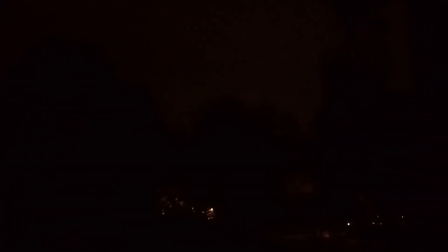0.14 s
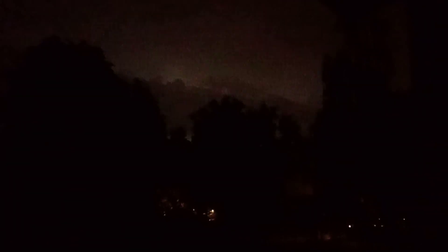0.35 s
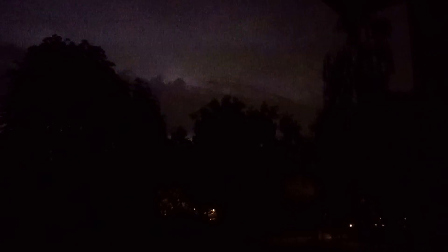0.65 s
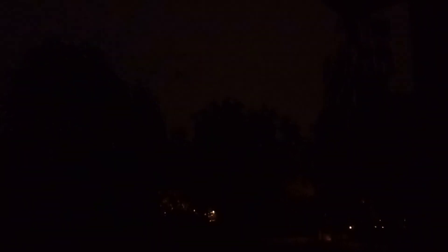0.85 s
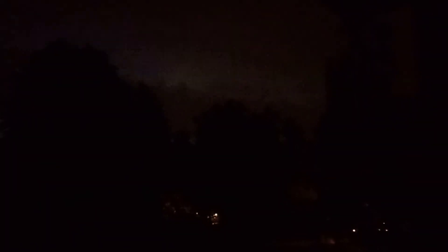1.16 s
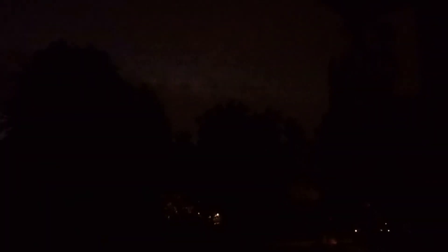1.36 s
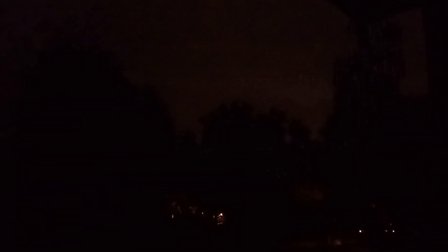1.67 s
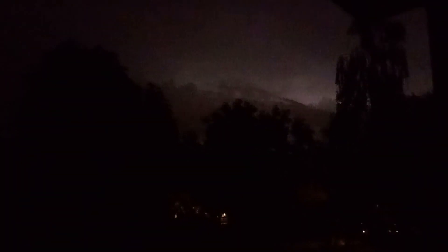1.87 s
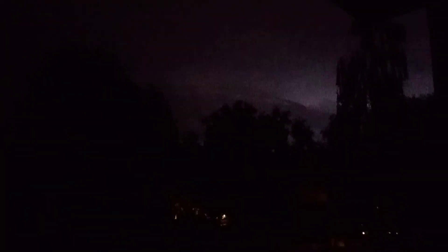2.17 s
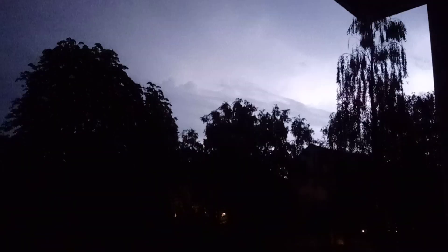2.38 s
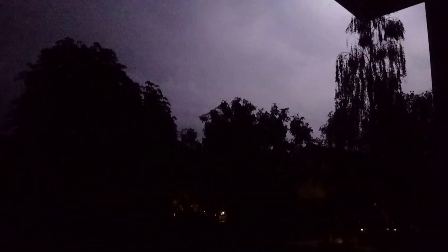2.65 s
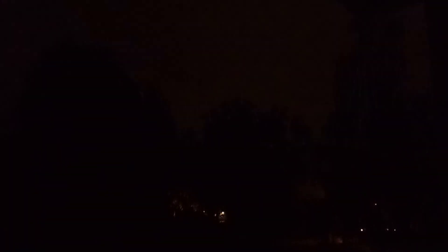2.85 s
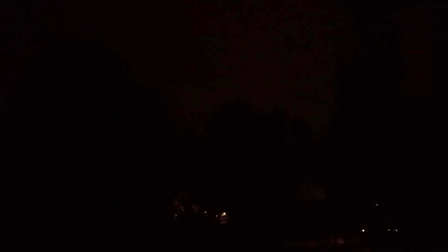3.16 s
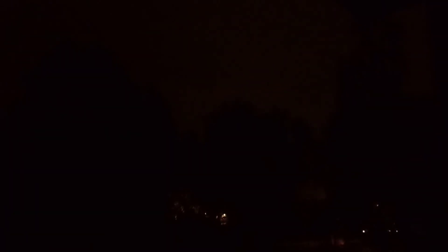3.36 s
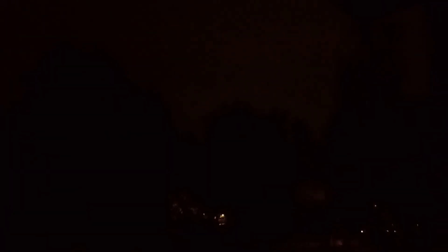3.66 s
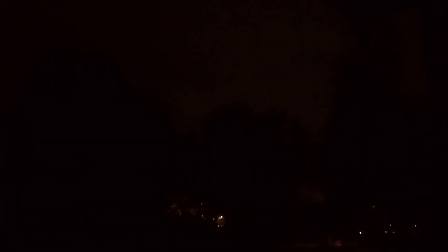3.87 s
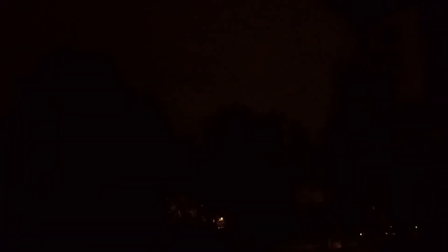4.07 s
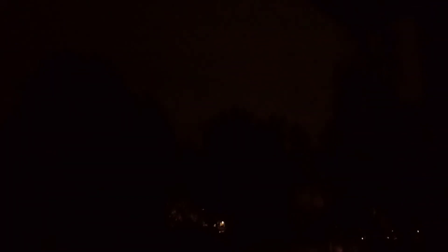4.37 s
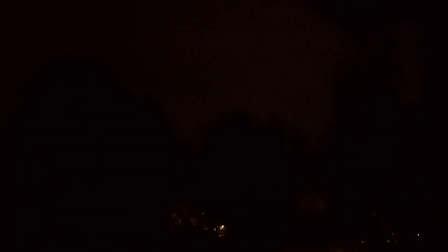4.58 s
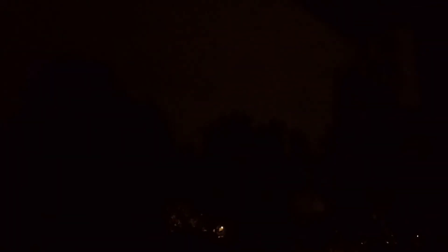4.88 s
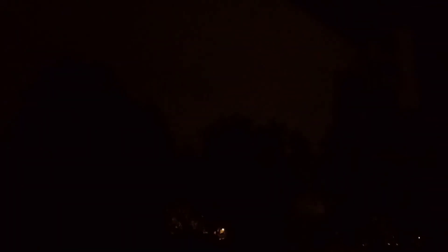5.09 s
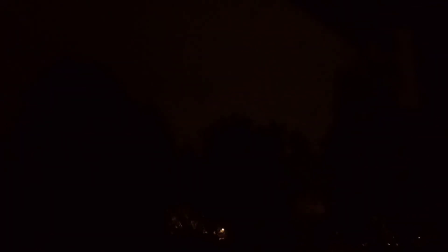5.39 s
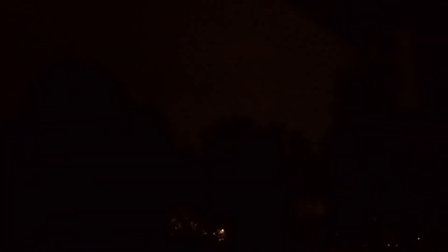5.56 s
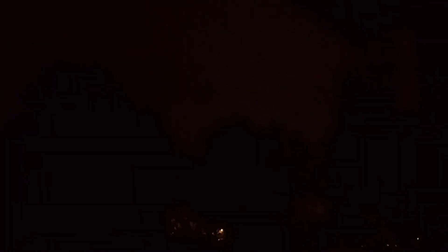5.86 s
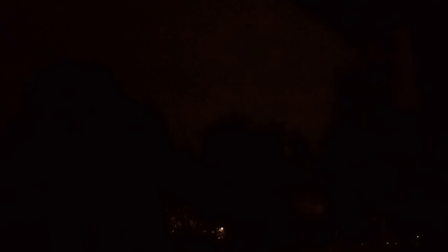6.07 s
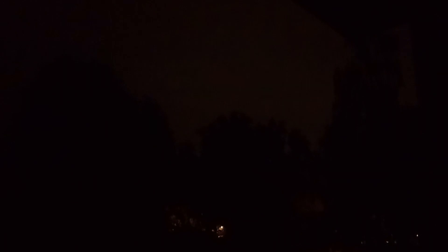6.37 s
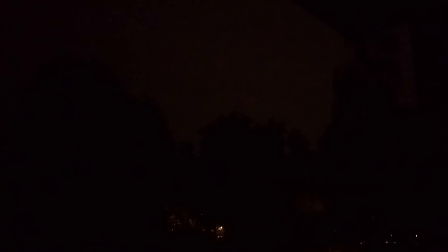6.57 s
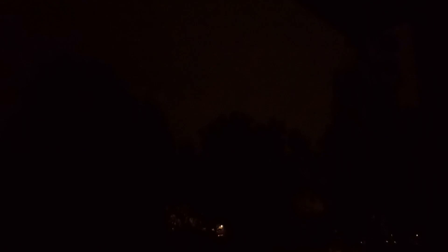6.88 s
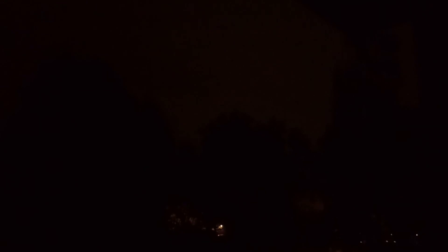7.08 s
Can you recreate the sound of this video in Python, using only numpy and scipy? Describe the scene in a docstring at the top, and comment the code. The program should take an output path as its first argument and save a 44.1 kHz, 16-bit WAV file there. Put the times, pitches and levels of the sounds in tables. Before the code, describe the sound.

An approaching storm heard from a sheltered porch: a long, unbroken low thunder roll with uneven soft booms, never a sharp crack. Thin rain falls around, leaves drip in short irregular flurries, and crisp drops tap close to the microphones. A single hollow, woody-sounding knock with a tiny settling clatter comes before two seconds; then only thunder and rain continue, with a tight cluster of close drops near the end. Right side brighter, slight hiss.

```python
"""Distant thunder rolls without a break, heard from under a porch roof in light rain.
Random shocks, filtered by distance and split into registers, follow level curves with booms and thumps.
Far drops are a noise wash; near ones are noise splashes that patter, drip in flurries or fall singly.
Something hollow knocks once close by and settles: filtered clacks excite ringing modes.
Both channels share the bass of diffuse sound; the left is much duller from 6 to 11 kHz."""
import sys
import numpy as np
from scipy import signal
from scipy.fft import rfft, irfft, next_fast_len
from scipy.io import wavfile
from scipy.ndimage import uniform_filter1d

SR = 44100
rng = np.random.default_rng(int(sys.argv[2]) if len(sys.argv) > 2 else 0)


def generate_wav(sig):
    """Save sig (samples, or channels by samples) to the path in sys.argv[1] as 16-bit PCM at SR."""
    pcm = np.round(np.clip(np.atleast_2d(sig).T, -1, 1) * 32767).astype(np.int16)
    wavfile.write(sys.argv[1], SR, pcm)


N = 318914
TIME = np.arange(N) / SR


def from_db(db):
    """Decibels to amplitude gain."""
    return 10 ** (np.asarray(db) / 20)


def rms_one(x):
    """Scale to an rms of one."""
    return x / np.sqrt(np.mean(x ** 2) + 1e-20)


def in_time(rows):
    """Interpolate each column of a time curve at every sample."""
    s, *columns = np.transpose(rows)
    return [np.interp(TIME, s, column) for column in columns]


def at_hz(points, hz):
    """Read a spectrum on a log-frequency axis."""
    known_hz, values = np.transpose(points)
    return np.interp(np.log(np.maximum(hz, 1)), np.log(known_hz), values)


def colour(x, spectrum, size=8192):
    """Causal minimum-phase filter with the given response, via the folded cepstrum."""
    bins_hz = np.linspace(0, SR / 2, size // 2 + 1)
    cepstrum = irfft(np.log(from_db(at_hz(spectrum, bins_hz))))
    cepstrum[1:size // 2] *= 2
    cepstrum[size // 2 + 1:] = 0
    response = irfft(np.exp(rfft(cepstrum)))
    return signal.fftconvolve(np.atleast_2d(x), response[None], axes=1)[:, :N]


def butter(x, hz, kind, order=2):
    """Causal Butterworth filter."""
    return signal.sosfilt(signal.butter(order, hz, kind, fs=SR, output="sos"), x)


def split(x, hz):
    """Parts below and above a frequency, without phase shift; they sum to the whole."""
    below = signal.sosfiltfilt(signal.butter(6, hz, fs=SR, output="sos"), x)
    return below, x - below


def drift(per_s):
    """Random wandering of rms one, with per_s knots a second."""
    knots = rng.standard_normal(2048)
    return rms_one(np.interp(TIME * per_s, np.arange(len(knots)), knots))


def diffuse(pair):
    """Mix two unrelated signals so that their correlation matches sound from all around."""
    # likeness of diffuse sound at the two microphones: (frequency [Hz], correlation [-1..1])
    likeness = [(60, 1), (150, 0.98), (280, 0.9), (450, 0.72), (700, 0.32), (1000, 0.48), (1300, 0.0097),
                (1700, -0.44), (2250, 0.31), (2700, -0.012)]
    size = next_fast_len(N, True)
    mid, side = rfft(pair, size)
    alike = np.clip(at_hz(likeness, np.linspace(0, SR / 2, len(mid))), -1, 1)
    mid = mid * np.sqrt((1 + alike) / 2)
    side = side * np.sqrt((1 - alike) / 2)
    return irfft(np.array([mid + side, mid - side]), size)[:, :N]


def arrivals(per_s, spread_db):
    """Impulses at random moments, of random size and sign."""
    born = rng.random(N) < per_s / SR
    sizes = from_db(spread_db * np.clip(rng.standard_normal(N), -2, 2))
    return born * sizes * rng.choice([-1, 1], N)


def burst(hit_t60, tail_db, tail_t60, build_s=0.0013):
    """Half-second stereo noise spatter; reflections under the roof build up, then die away (t60 [s])."""
    t = TIME[:SR // 2]
    hit = from_db(-60 * t / hit_t60)
    reflections = from_db(tail_db - 60 * t / tail_t60) * (1 - np.exp(-t / build_s))
    return np.hypot(hit, reflections) * rng.standard_normal((2, len(t)))


def add(out, s, sound):
    """Mix a sound in at its moment."""
    start = max(round(s * SR), 0)
    out[:, start:start + sound.shape[1]] += sound[:, :N - start]


def far_rain(patches_per_s=12, flutter_db=0.75):
    """Countless drops on trees and roofs merge into noise; each surface (band) flutters by itself."""
    # wash spectrum: (frequency [Hz], relative density [dB/Hz])
    wash_spectrum = [(150, -37.5), (450, -2), (800, -3), (1200, -1.5), (1750, 1.5), (3000, -0.6),
                     (6500, -3), (8200, -17), (12000, -14.5), (16000, -26)]
    # wash level: (time [s], level [dB])
    wash_level = [(0, -55), (1.5, -55), (2.2, -55.5), (7.23, -54.5)]
    out, rest = 0, rms_one(diffuse(colour(rng.standard_normal((2, N)), wash_spectrum)))
    for edge_hz in [700, 1100, 1700, 2600, 3800, 5500]:
        surface, rest = split(rest, edge_hz)
        out = out + surface * from_db(flutter_db * drift(patches_per_s))
    return from_db(in_time(wash_level)[0]) * (out + rest)


def splash(pitch_hz, t60, width, broad_db, tail_db):
    """One drop: a noise slap in which the struck leaf or puddle stresses one pitch; peak 1."""
    slap = burst(hit_t60=t60, tail_db=tail_db, tail_t60=.2)[:, :SR // 5]
    pitched = butter(slap, [pitch_hz / width, pitch_hz * width], "band")  # width: frequency ratio
    sound = pitched + from_db(broad_db) * butter(slap, [1500, 7000], "band")
    return sound / np.abs(sound).max()


def patter(drops_per_s, spectrum, count=16):
    """Drops fall at random on spots of different pitch; rms 1."""
    out = 0
    for hz in np.geomspace(1900, 9000, count):
        spot = splash(hz, t60=0.011, width=1.142, broad_db=-11, tail_db=-12)
        hits = arrivals(drops_per_s / count, spread_db=2.5)
        out = out + signal.oaconvolve(hits[None], spot, axes=1)[:, :N]
    return rms_one(diffuse(colour(out, spectrum)))


def flurry_strength(rise_s=0.026, fall_db_per_s=84):
    """Gain of the drip flurries: each rises quickly to its crest, then thins out."""
    # drip flurries from the leaves: (crest time [s], level [dB])
    flurries = [(0.1, -58), (0.25, -51.5), (0.84, -51.5), (0.92, -63), (1.1, -52), (1.26, -57.5),
                (1.72, -54.5), (1.8, -68), (2.02, -58), (2.11, -61), (2.15, -61), (2.33, -52.5),
                (2.72, -54), (2.85, -56), (2.96, -59), (3.18, -56.5), (3.29, -60), (3.485, -64),
                (3.61, -59), (3.73, -59.5), (4.26, -52.5), (4.38, -54), (4.55, -59), (4.665, -60),
                (5.005, -56), (5.18, -53.5), (5.41, -55), (5.5, -58), (5.96, -59), (6.05, -56.5),
                (6.52, -56), (6.61, -55.5), (6.81, -67), (7.08, -56.5)]
    power = 0
    for s, db in flurries:
        rise = np.clip(1 + (TIME - s) / rise_s, 0, 1)
        fall = from_db(db - fall_db_per_s * np.maximum(TIME - s, 0))
        power = power + (rise * fall) ** 2
    return np.sqrt(power)


def near_rain(drops_per_s=230, drips_per_s=400, wander_db=0.9, wanders_per_s=14):
    """A gently wandering patter all around, and brighter flurries of drips from the nearest leaves."""
    # patter between the flurries: (time [s], level [dB])
    patter_level = [(0, -58.5), (0.7, -63), (1.3, -56.5), (1.45, -66), (1.6, -55), (2.6, -58), (3.8, -55.5),
                    (4.0, -60.5), (4.2, -59), (5.6, -56), (6.4, -61), (7.23, -56)]
    # filter on the patter splashes: (frequency [Hz], gain [dB])
    patter_filter = [(300, -47), (900, 7.5), (2000, -3), (4000, -4), (6500, 1.5), (8200, -3), (12000, -12),
                     (16000, -8)]
    # filter on the flurry splashes: (frequency [Hz], gain [dB])
    flurry_filter = [(1200, -21), (2200, -3), (4000, -3), (6500, 0), (8200, 2), (9500, -9), (12000, -12),
                     (16000, -24)]
    steady_gain = from_db(in_time(patter_level)[0] + wander_db * drift(wanders_per_s))
    steady = steady_gain * patter(drops_per_s, patter_filter)
    return steady + flurry_strength() * patter(drips_per_s, flurry_filter)


def close_drops(drop_db=3, tick_db=17, tick_hz=8600, tick_right_db=2):
    """Fat drops from the eaves, nearly dry, and thin high-passed ticks of spray a little to the right."""
    # fat drops: (time [s], peak before drop_db [dB], pitch [Hz], splash t60 [s])
    fat_drops = [(0.2547, -48, 6150, .05), (0.4539, -42, 6100, .012), (0.8307, -48, 3770, .014),
                 (0.831, -48, 2340, .014), (0.8544, -49, 4200, .03), (0.9193, -43, 6270, 0.013),
                 (0.9393, -47, 4420, .014), (1.0874, -55, 4480, .02), (1.2565, -53, 5420, .012),
                 (1.302, -40, 5890, .012), (1.803, -41, 5800, .025), (2.0167, -45, 6300, .025),
                 (2.1046, -50.5, 3380, .014), (2.15, -43.5, 4440, 0.027), (2.743, -48, 4480, .02),
                 (3.1698, -37, 5130, 0.0089), (3.1697, -47, 2340, 0.011), (3.4795, -45, 4570, .014),
                 (3.492, -46, 3950, .014), (3.587, -43, 4470, .012), (3.6114, -43.5, 5140, .018),
                 (3.643, -42.5, 5080, .025), (3.6424, -44.5, 2030, .014), (3.716, -54, 6070, .012),
                 (3.7487, -44, 3630, .014), (4.5356, -49, 6180, .012), (4.5498, -42.5, 3750, .014),
                 (4.654, -43, 6540, 0.012), (4.999, -44, 5600, .02), (5.166, -44, 6400, .014),
                 (5.191, -39, 6760, .012), (5.195, -42, 6000, .016), (5.4066, -48, 2450, .014),
                 (5.453, -40.5, 3600, .016), (5.963, -45, 5570, .014), (6.0711, -46, 4310, .012),
                 (6.2176, -44, 4030, 0.015), (6.581, -38, 5360, 0.024), (6.604, -40.5, 3800, .03),
                 (6.606, -37.5, 5740, 0.045), (6.621, -44, 4600, .03), (6.664, -41.5, 2290, 0.0097),
                 (6.6655, -50, 5130, .014), (6.68, -42.5, 4960, 0.025)]
    # spray ticks: (time [s], peak before tick_db and pan [dB])
    spray_ticks = [(1.666, -53), (2.1065, -60), (5.1897, -51.5), (5.901, -59), (6.2152, -58)]
    out = np.zeros((2, N))
    for s, peak_db, hz, t60 in fat_drops:
        drop = splash(hz, t60, width=1.22, broad_db=-13, tail_db=-15)
        add(out, s, from_db(peak_db + drop_db) * drop)
    pan_db = tick_right_db * np.array([[-1], [1]])
    for s, peak_db in spray_ticks:
        tick = butter(burst(hit_t60=0.013, tail_db=-6.0, tail_t60=0.15), tick_hz, "high", order=10)
        add(out, s, from_db(peak_db + tick_db + pan_db) * tick / np.abs(tick).max())
    return out


def knock(clack_db=5.5, ring_db=-1.5, rise_s=0.0014, spot_width=1.15,
          scatter_max=.65, scatters_per_s=55, scatter_build_s=.1):
    """Contacts clack and feed hollow modes, which start in step at the soft first thump, then scatter."""
    # soft first thump, knock and settling rattle:
    # (time [s], relative level [dB], brightness [Hz], pitch stressed by the touched spot [Hz])
    contacts = [(1.627, -34.5, 410, 455), (1.666, -51.5, 600, 520), (1.7103, -42.5, 3000, 700),
                (1.7148, -38.5, 2400, 750), (1.721, -42, 3500, 2050), (1.735, -45, 2200, 1130),
                (1.76, -53, 1800, 440), (1.775, -58, 2200, 920), (1.795, -55, 3500, 2300),
                (1.812, -56, 1500, 620), (1.872, -58, 1600, 1350), (1.928, -67, 2000, 890)]
    # filter on the contact noise: (frequency [Hz], gain [dB])
    clack_filter = [(120, -12), (330, 1), (560, 9), (720, 6), (1000, -1), (1400, -0.5), (1700, -7),
                    (2150, -2.5), (2900, -3), (6000, -5), (12000, -45)]
    # modes of the hollow thing: (frequency [Hz], relative level [dB], t60 [s], left minus right [dB])
    modes = [(380, -11, 0.33, 7), (463, -5, 0.082, 0), (496, -15.5, 0.92, 0), (578, -17, .2, 0),
             (647, -0.5, 0.12, -5), (697, 1, 0.13, 15), (795, -3.5, 0.11, -10), (867, -21, 0.13, -1),
             (1060, -9, 0.16, -8), (1100, -28, 0.14, 2), (1217, -24, 0.64, -4), (1350, -24, 1, 5),
             (1407, -25, 1, -2), (1540, -25, 0.42, 0), (2030, -9, 0.086, -5), (2320, -16, 0.13, 3)]
    clacks, rings = np.zeros((2, N)), np.zeros((2, N))
    for s, level_db, bright_hz, spot_hz in contacts:
        clack = butter(burst(hit_t60=0.051, tail_db=-10.5, tail_t60=0.91), bright_hz, "low")
        clack = clack + butter(clack, [spot_hz / spot_width, spot_hz * spot_width], "band")
        add(clacks, s, from_db(level_db + clack_db) * clack)
    at, contact_db, bright_hz, _ = np.transpose(contacts)[:, :, None]
    age = TIME[:SR] - (at - at.min())
    main_age = age[np.argmax(contact_db)]  # the first thump has the highest level
    # echoes under the roof make the ringing ragged
    scatter = scatter_max * np.clip(main_age / scatter_build_s, 0, 1)
    for hz, mode_db, t60, pan_db in modes:
        decay = from_db(contact_db - 60 * np.abs(age) / t60)
        feeds = np.clip(age / rise_s, 0, 1) * decay
        feeds = feeds / np.hypot(1, (hz / bright_hz) ** 4)  # dull contacts feed high modes less
        envelope = np.linalg.norm(feeds, axis=0)
        wander = drift(scatters_per_s)[:SR] + 1j * drift(scatters_per_s)[:SR]
        phasor = np.sqrt(1 - scatter ** 2) + scatter * wander / np.sqrt(2)
        mode = envelope * np.imag(phasor * np.exp(2j * np.pi * hz * main_age))
        side_db = np.array([[pan_db], [-pan_db]]) / 2
        add(rings, at.min(), from_db(mode_db + ring_db + side_db) * mode)
    return diffuse(colour(clacks, clack_filter)) + rings


def boom_power(hz, width_octaves=0.42):
    """A boom is a bundle of shocks arriving together: it swells and fades, strongest near its pitch."""
    # booms out of the roll: (crest time [s], length [s], level at own pitch [dB], pitch [Hz])
    booms = [(0.153, 0.043, -43.5, 157), (0.348, 0.061, -37, 87), (0.53, 0.19, -45, 174),
             (0.876, 0.059, -39.5, 171), (1.061, 0.094, -38, 82.5), (1.248, 0.046, -43, 260),
             (1.51, 0.097, -36.5, 91), (1.706, 0.19, -56, 159), (1.748, 0.23, -36, 87),
             (2.034, 0.058, -41, 111), (2.352, 0.17, -38.5, 99), (2.384, 0.071, -43, 213),
             (2.448, 0.053, -33.5, 170), (2.56, 0.1, -36.5, 143), (3.1, 0.04, -41, 130),
             (3.155, 0.035, -45, 213), (3.247, 0.042, -32, 77), (3.393, 0.035, -45, 230),
             (3.395, 0.033, -36, 133), (3.439, 0.176, -39.5, 77), (3.556, 0.073, -39, 155),
             (3.573, 0.066, -47.5, 48), (3.665, 0.049, -43, 185), (3.68, 0.093, -52.5, 342),
             (3.71, 0.092, -42.5, 108), (3.858, 0.095, -47, 151), (4.297, 0.062, -39.0, 73),
             (4.457, 0.029, -40.5, 125), (4.58, 0.048, -37, 113), (4.677, 0.17, -50, 229),
             (4.926, 0.07, -44.5, 157), (5.016, 0.11, -47.0, 139), (5.3, 0.22, -45, 145),
             (5.374, 0.05, -57, 319), (5.68, 0.062, -39, 128), (5.987, 0.052, -45, 155),
             (6.602, 0.057, -37, 163), (6.717, 0.091, -39.5, 182), (6.753, 0.05, -54.5, 420),
             (6.832, 0.047, -40, 210), (6.898, 0.12, -37.5, 159), (7.04, 0.05, -41.0, 111)]
    power = 0
    for s, length_s, db, pitch_hz in booms:
        swell = (2 * (TIME - s) / length_s) ** 2
        detune = (np.log2(hz / pitch_hz) / width_octaves) ** 2
        power = power + from_db(db) ** 2 * np.exp(-swell - detune)
    return power


def thumps():
    """Short thumps within the roll: each is a sine under a Gaussian, one main push and pull."""
    # thumps: (midpoint [s], level of the sine before the Gaussian [dB], pitch [Hz])
    short_thumps = [(0.883, -42, 170), (1.25, -28, 190), (1.335, -33, 115), (1.74, -35, 110),
                    (2.363, -39, 172), (2.449, -38, 165), (3.084, -32, 141), (3.252, -31, 100),
                    (3.401, -33.5, 130), (3.681, -32, 149), (4.144, -29, 130), (4.212, -30, 130),
                    (6.01, -32.5, 200), (6.43, -34, 160), (6.47, -29.5, 170), (7.017, -28.5, 125)]
    out = 0
    for s, level_db, pitch_hz in short_thumps:
        turn = 2 * np.pi * pitch_hz * (TIME - s)
        out = out + from_db(level_db) * np.sin(turn) * np.exp(-(turn / np.pi) ** 2 / 2)
    return out


def thunder(shocks_per_s=2500, merge_s=0.078, wall_s=0.01935, wall_db=-13,
            throb_db=1.5, throbs_per_s=16, left_lag_s=3 / SR):
    """Shocks from all along the lightning channels overlap; those from nearer branches keep more growl."""
    # thunder after kilometres of air: (frequency [Hz], gain [dB])
    air_filter = [(12, -33), (24, -1.5), (41, -12.5), (58, -3), (80, 2), (100, 4), (130, 4.5), (165, 0.5),
                  (205, -5), (260, -10), (350, -18), (480, -28.5), (700, -40.5), (2000, -77)]
    # course of the roll: (time [s], deep swell [dB], low body [dB], high body [dB], growl [dB], rasp [dB])
    roll_levels = [(0, -53, -42, -48.5, -46.5, -56.5), (0.3, -52, -58, -46, -53, -61.5),
                   (0.7, -54, -44, -52.5, -54.5, -62.0), (1.1, -61, -60, -43.5, -49.5, -63.5),
                   (1.35, -53, -35.5, -38.5, -51, -60), (1.65, -56.0, -61, -50, -48.5, -57.5),
                   (1.92, -51, -47, -44.5, -56.5, -60), (2.2, -51, -49.5, -46, -51.0, -56.0),
                   (2.5, -56.5, -60, -61, -57.5, -55.5), (2.72, -51, -43, -46, -52.5, -68.0),
                   (3.0, -53, -42.5, -45.0, -50, -57), (3.2, -49, -47, -37.5, -50.5, -59),
                   (3.6, -57, -54.5, -53, -52, -61.5), (3.85, -51, -46.5, -53.5, -53.5, -66),
                   (4.2, -57, -44, -41.5, -50.5, -57.5), (4.45, -64, -53.0, -51.5, -51, -61.5),
                   (4.7, -54, -43, -50, -57.5, -60.5), (5.1, -58.5, -53.5, -61, -56, -65),
                   (5.5, -62, -48, -52.5, -59, -68), (5.85, -61, -54, -44.5, -57, -60.0),
                   (6.05, -60, -50, -50.5, -52, -59), (6.32, -54, -47.5, -47.5, -53.5, -63.5),
                   (6.52, -48, -50, -41, -46.5, -59), (6.9, -56.5, -45.5, -54.5, -50.5, -55.5),
                   (7.23, -50, -49, -37, -51, -57)]
    edges_hz, centres_hz = [70, 135, 210, 330], [45, 105, 168, 265, 410]
    shocks = [arrivals(shocks_per_s, spread_db=2.5) for ear in range(2)]
    rest = diffuse(colour(shocks, air_filter))
    # echo from a nearby wall makes the roll boom at a few pitches
    add(rest, wall_s, from_db(wall_db) * rest)
    registers = []
    for edge_hz in edges_hz:
        part, rest = split(rest, edge_hz)
        registers.append(part)
    registers.append(rest)
    out = 0
    for part, level_db, centre_hz in zip(registers, in_time(roll_levels), centres_hz):
        roll_power = from_db(level_db + throb_db * drift(throbs_per_s)) ** 2
        power = roll_power + boom_power(centre_hz)
        # level out the running power, then impose the roll and its booms
        strength = uniform_filter1d(np.mean(part ** 2, axis=0), int(merge_s * SR)) + 1e-18
        out = out + part * np.sqrt(power / strength)
    left, right = out + thumps()
    # the storm stands a little to the right
    return np.array([np.interp(TIME - left_lag_s, TIME, left), right])


def scene():
    """Thunder under the rain, with the close sounds on top."""
    return thunder() + far_rain() + near_rain() + close_drops() + knock()


def record(dry, hiss_db=-75, hiss_right_db=0.5, cutoff_hz=15650):
    """Each microphone has its own colour; faint electronic hiss is added and the top is cut."""
    # microphone responses: (frequency [Hz], gain [dB])
    left_mic = [(100, -4), (1000, -2.5), (1600, 2), (1950, 1), (2270, 4), (2700, -0.5), (3100, -4),
                (4100, 3.5), (5200, -1.5), (6200, -12.5), (7100, -15.5), (8000, -32), (15000, -25)]
    right_mic = [(100, -1.5), (1000, -0.13), (1600, 1.5), (1950, 2), (2270, 3.5), (2900, -0.5), (4200, 3.5),
                 (5400, 3), (6400, 4.5), (7200, -1), (8200, -11.5), (11000, -11.5), (15000, -43)]
    # hiss of the electronics: (frequency [Hz], relative density [dB/Hz])
    hiss_spectrum = [(100, -15), (13900, -14.5), (14500, -10), (15200, 1), (15700, -15)]
    heard = np.vstack([colour(dry[0], left_mic), colour(dry[1], right_mic)])
    hiss = rms_one(colour(rng.standard_normal((2, N)), hiss_spectrum))
    hiss = from_db(hiss_db + hiss_right_db * np.array([[-1], [1]])) * hiss
    low_pass = signal.ellip(12, .1, 80, cutoff_hz, fs=SR, output="sos")
    return signal.sosfilt(low_pass, heard + hiss)


dry = scene()
out = record(dry)
generate_wav(out)
```